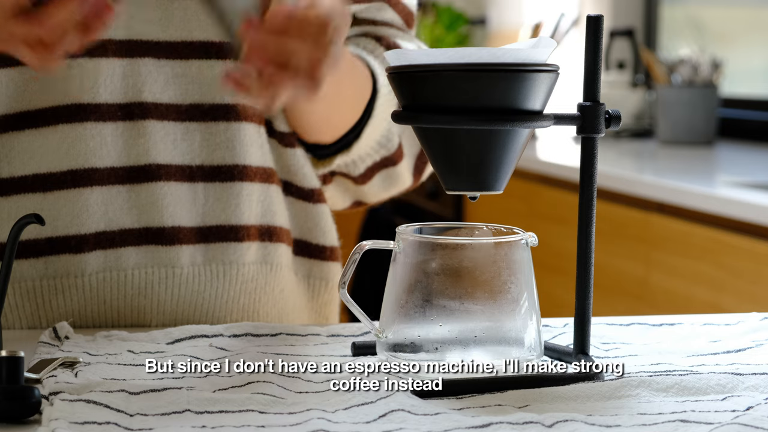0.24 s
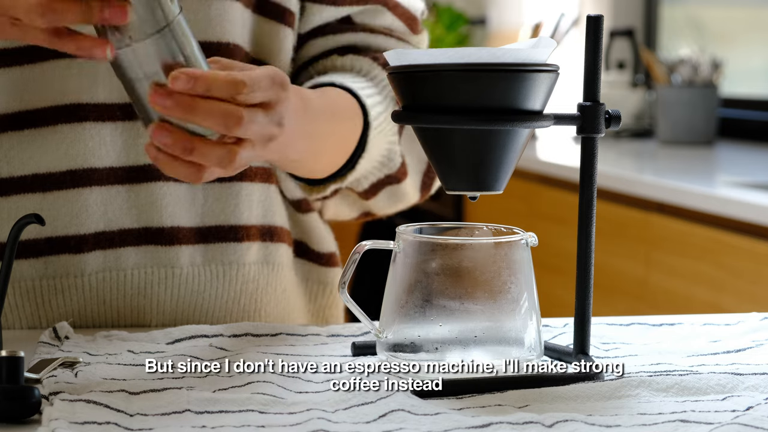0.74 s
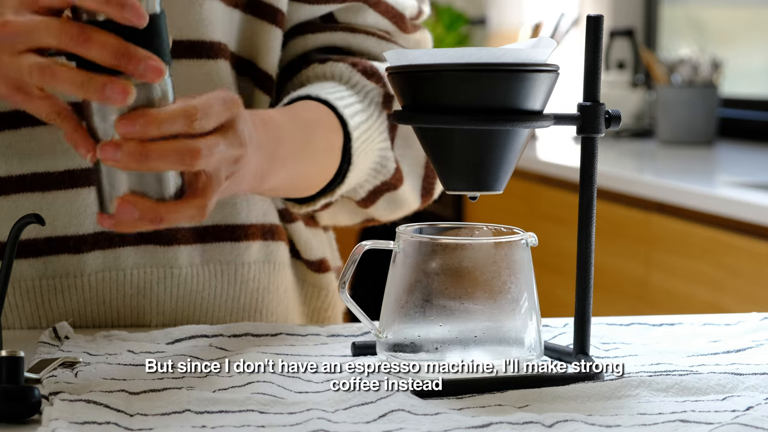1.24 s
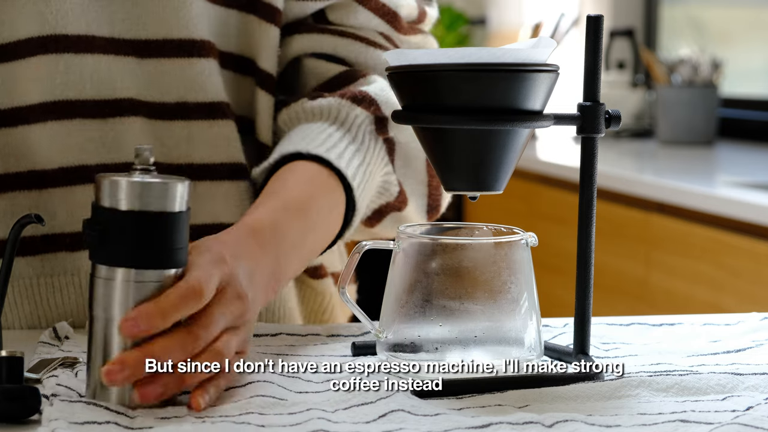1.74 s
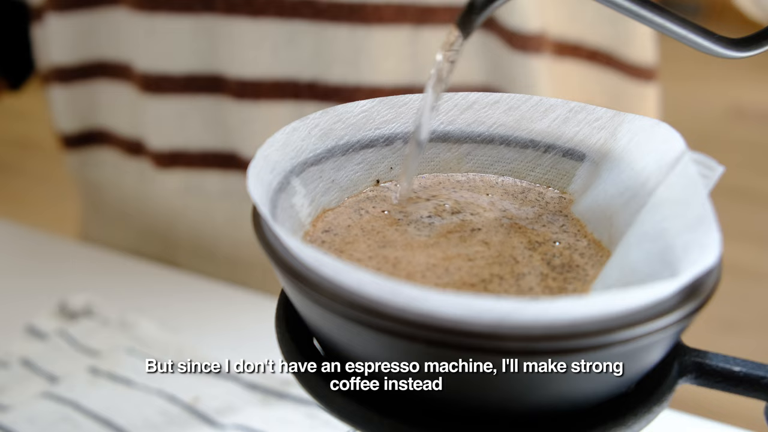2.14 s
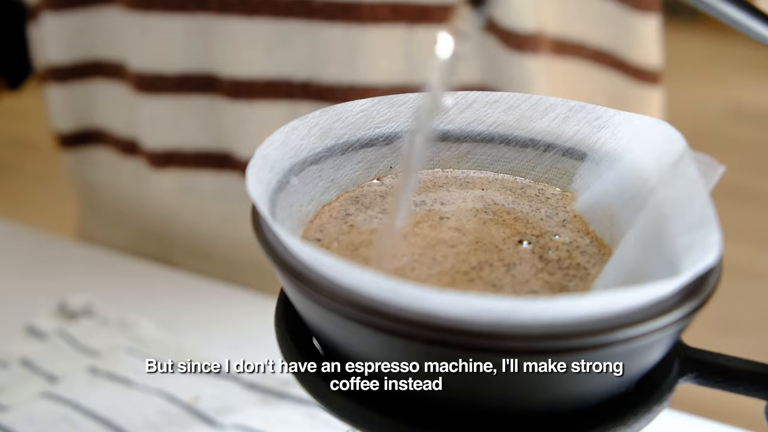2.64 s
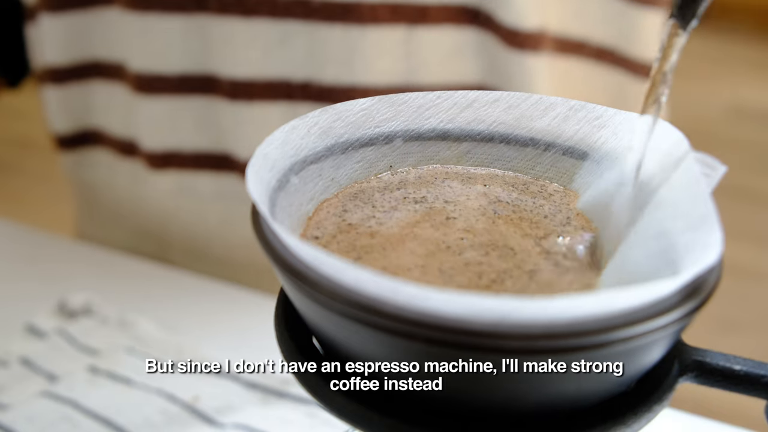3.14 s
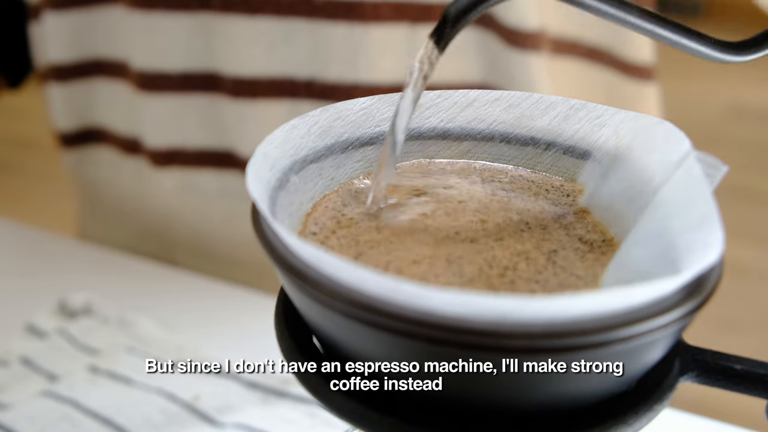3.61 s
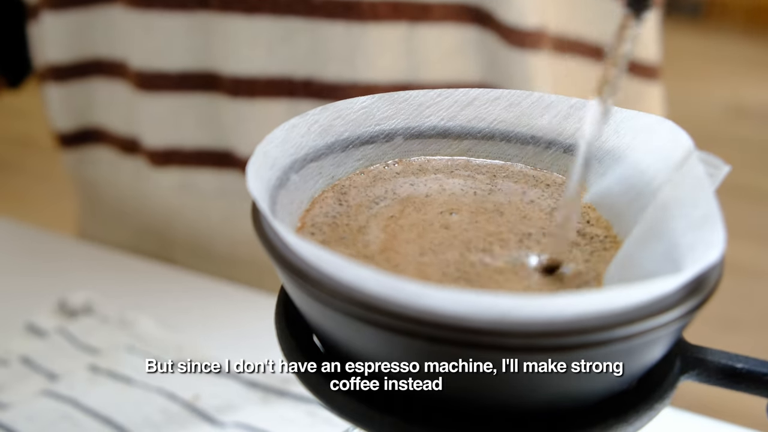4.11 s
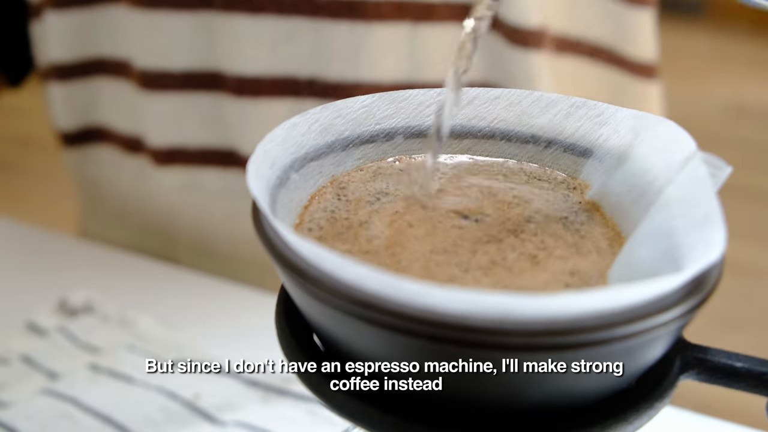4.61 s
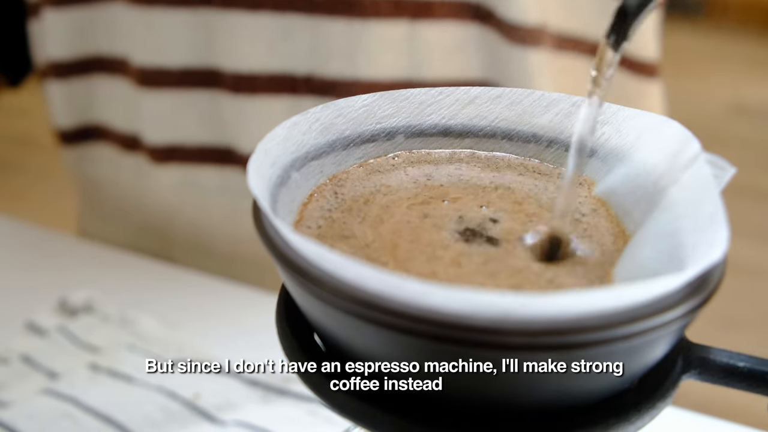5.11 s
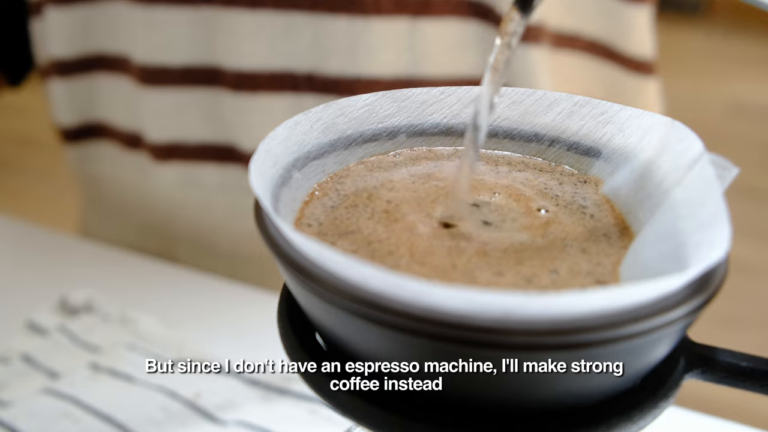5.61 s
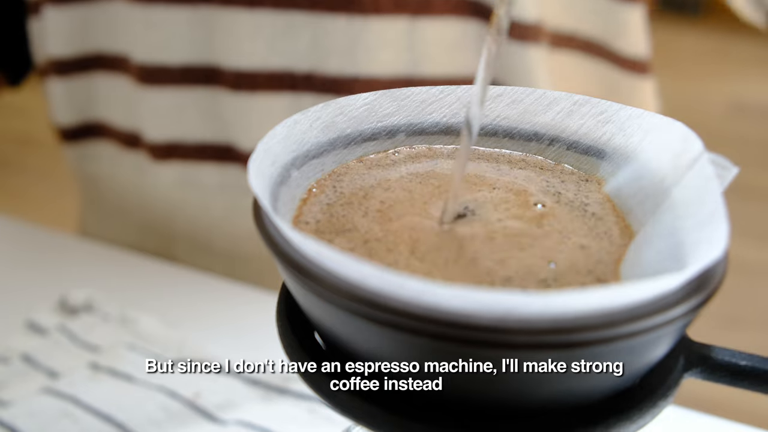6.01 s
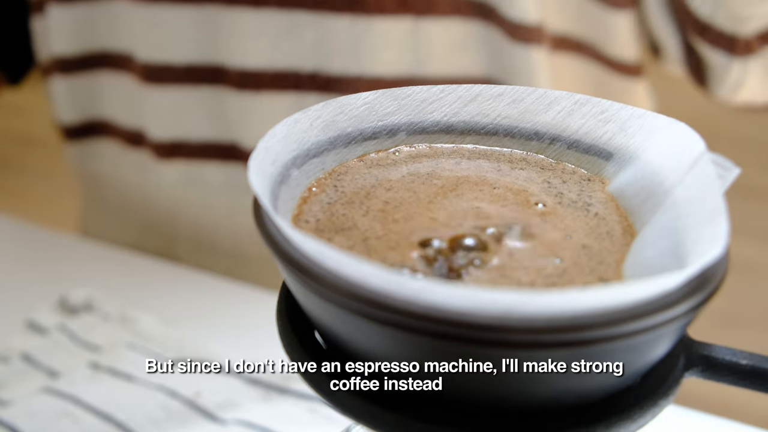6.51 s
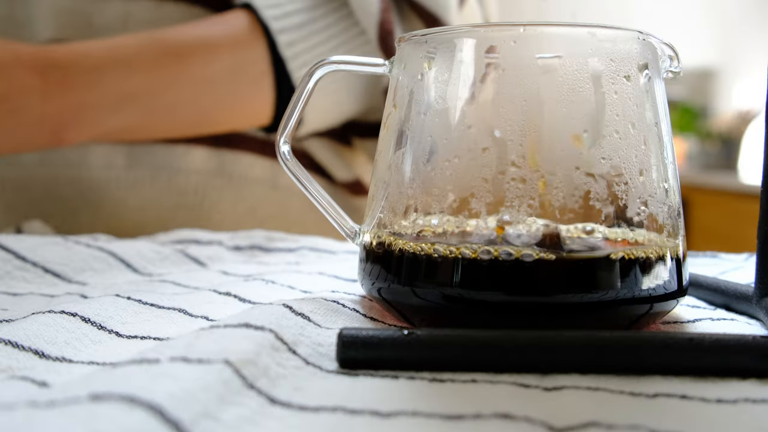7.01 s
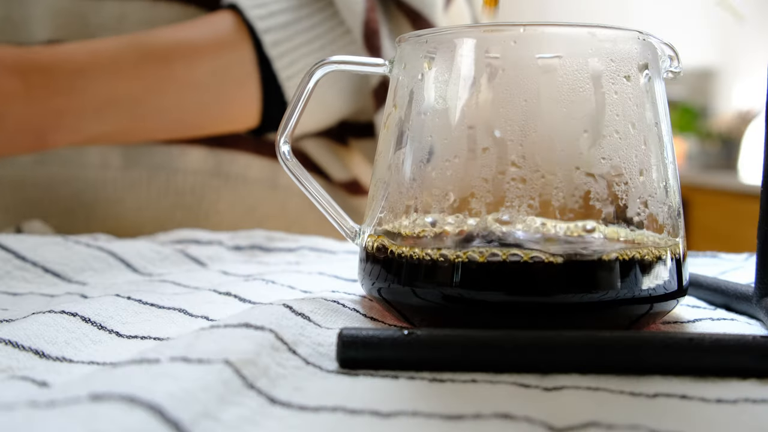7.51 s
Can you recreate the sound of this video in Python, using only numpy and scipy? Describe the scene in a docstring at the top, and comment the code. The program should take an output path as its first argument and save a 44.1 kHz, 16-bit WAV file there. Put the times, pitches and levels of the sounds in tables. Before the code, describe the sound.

Close in a small hard kitchen, a steel hand grinder gets a light tap, a brief scrape and a sharp hard knock as its halves shut, then a soft set-down. The sound moves nearer to coffee dripping into a glass server: irregular bright plinks growing denser, a burst of splatter and gurgle, then sparse drops and small glass taps over faint hum and hiss.

```python
"""A tap on a steel hand grinder, heard close by on a kitchen counter, then its halves pushed shut and set down.
Coffee then drips from a filter cone into a glass server: each drop is a climbing bubble tone, an air thump,
a slap and a noise splash, ringing the glass; finer trickle and a gurgle join it. Knocks are decaying modes.
A small hard room answers everything over a soft appliance hum and the hiss of a stereo microphone."""
import sys
import numpy as np
from scipy import signal
from scipy.fft import rfft, irfft
from scipy.io import wavfile
from scipy.ndimage import uniform_filter1d

SR = 44100
rng = np.random.default_rng(int(sys.argv[2]) if len(sys.argv) > 2 else 0)


def unload_audio(sound):
    """Save the sound as a 16-bit wav file, at the path given as the first command line argument."""
    columns = np.transpose(np.atleast_2d(sound))
    # keep every value between -1 and 1, then stretch to whole-number steps
    steps = np.round(np.clip(columns, -1, 1) * 32767)
    wavfile.write(sys.argv[1], SR, steps.astype(np.int16))


N = 341775  # samples

# Every ring time is the time to fall by 60 dB; drop levels are those ahead of the server and the room.
# Coffee drops. Each row: start in seconds, bubble starting pitch in Hz, bubble peak in dB, ring in seconds,
# air thump peak in dB, splash peak in dB.
DROPS = [(2.219, 2850, -47, 0.0091, -55.5, -45), (2.26, 2550, -42.5, 0.0051, -56, -59),
         (2.459, 2900, -46.5, 0.0067, -64, -39), (2.513, 2970, -29, 0.0057, -54, -27),
         (2.525, 1880, -34, 0.027, -26, -40), (2.602, 1340, -38.5, 0.035, -44, -49),
         (2.754, 3250, -32.5, 0.0065, -46.5, -46), (2.757, 2920, -34, 0.011, -63, -37),
         (2.825, 1250, -43, 0.031, -51, -68), (2.849, 2820, -43.5, 0.025, -55, -64),
         (2.856, 1880, -33, 0.014, -42.5, -62), (2.914, 2050, -46, 0.011, -60, -39),
         (3.026, 2060, -45, 0.019, -59, -58), (3.044, 2950, -34, 0.004, -50, -45),
         (3.267, 1320, -49, 0.02, -57, -53), (3.445, 3490, -30, 0.0062, -58, -44),
         (3.465, 3050, -29, 0.0034, -30, -36), (3.55, 2040, -32, 0.025, -41, -60),
         (3.61, 2840, -42, 0.008, -66, -41.5), (3.703, 2804, -29, 0.014, -42.5, -47),
         (4.102, 3300, -42, 0.012, -75, -56), (4.122, 2130, -25.5, 0.012, -52, -43.5),
         (4.23, 3150, -25.5, 0.0062, -52, -50), (4.284, 3090, -34.5, 0.008, -54, -28),
         (4.365, 3860, -45.5, 0.008, -59, -50), (4.405, 2920, -35.5, 0.017, -56, -49),
         (4.427, 4760, -25, 0.01, -45.5, -22), (4.474, 2840, -36.5, 0.0064, -55, -38),
         (4.719, 2910, -25.5, 0.012, -42, -47.5), (4.78, 1430, -44, 0.01, -52, -63),
         (4.819, 1020, -49, 0.017, -74, -48), (4.894, 3100, -28.5, 0.0061, -51, -41),
         (4.95, 1282, -28, 0.025, -51, -59), (5.013, 2600, -29.5, 0.015, -52, -32),
         (5.057, 2793, -19.5, 0.017, -40, -36), (5.161, 1200, -43.5, 0.0091, -61, -39.5),
         (5.2, 1470, -30, 0.027, -43, -51), (5.222, 2470, -48, 0.008, -55, -61),
         (5.238, 2900, -34, 0.0076, -31, -47), (5.253, 1620, -32.5, 0.021, -60, -51),
         (5.275, 2040, -29, 0.014, -44, -38.5), (5.281, 2520, -30.5, 0.0066, -41, -48),
         (5.441, 2055, -30, 0.022, -63, -41), (5.461, 1990, -22, 0.02, -27.5, -38),
         (5.514, 1630, -31.5, 0.015, -58, -47.5), (5.63, 1320, -43.5, 0.029, -58, -61),
         (5.679, 1236, -36, 0.029, -46, -62), (5.717, 1550, -35.5, 0.017, -56, -37),
         (5.81, 3200, -32, 0.0086, -45, -40.5), (5.898, 4860, -37, 0.012, -63, -40),
         (5.915, 3520, -33, 0.0067, -58, -42), (5.951, 2870, -22, 0.015, -64, -34),
         (5.964, 4950, -23.5, 0.0065, -39.5, -18.5), (6.025, 3240, -24.5, 0.011, -48, -36.5),
         (6.059, 2690, -34.5, 0.019, -43, -41.5), (6.117, 1480, -36, 0.019, -61, -61),
         (6.15, 1560, -37, 0.031, -71, -53), (6.169, 900, -36.5, 0.014, -62.5, -30),
         (6.195, 960, -29.5, 0.015, -41, -26.5), (6.228, 930, -25.5, 0.0071, -38, -39),
         (6.241, 940, -32, 0.01, -46, -52), (6.276, 920, -41, 0.012, -65, -49),
         (6.298, 1310, -44, 0.042, -68, -54), (6.299, 2680, -46, 0.008, -59, -46),
         (6.303, 1235, -37, 0.039, -61, -58), (6.304, 3040, -35.5, 0.008, -59, -62),
         (6.363, 2800, -29, 0.0054, -43.5, -56), (6.41, 3920, -32, 0.006, -68, -46),
         (6.446, 920, -41.5, 0.032, -62, -57), (6.487, 3950, -32, 0.0031, -69, -61),
         (6.547, 1410, -42.5, 0.026, -55, -49), (6.566, 1440, -47, 0.025, -56, -52),
         (6.604, 1690, -45, 0.028, -78, -39), (6.889, 1440, -44.5, 0.01, -70, -68),
         (6.986, 4150, -34.5, 0.0093, -46.5, -39.5), (7.034, 1280, -28.5, 0.014, -42.5, -49),
         (7.741, 2500, -34.5, 0.029, -53, -52)]
# Dry splash ticks. Each row: start in seconds, peak in dB, pitch in Hz.
TICKS = [(2.877, -45, 6200), (3.062, -43.5, 5000), (3.122, -49, 4960), (3.295, -50, 4060),
         (3.404, -47, 4000), (3.4532, -40, 11500), (4.017, -44, 7900), (4.061, -48, 7000),
         (5.255, -38, 8300), (5.782, -38.5, 8400), (6.217, -31, 9000), (6.2204, -33, 8600),
         (6.5061, -47, 11000), (6.513, -42.5, 12100), (6.559, -47, 7600), (6.6087, -42, 8200),
         (6.847, -43.5, 12900)]
# Sharp splats as the stream breaks up. Each row: start in seconds, peak in dB, pitch in Hz.
SPLATS = [(5.1612, -34.5, 2500), (6.17, -18, 4670), (6.177, -23, 2170), (6.1954, -12, 8500),
          (6.2285, -23, 1960), (6.242, -26, 1910), (6.2506, -39, 1940), (6.29, -28, 4390),
          (6.2966, -28, 2630), (6.323, -27, 1890), (6.336, -30, 2040), (6.342, -33, 2520),
          (6.352, -37, 2550), (6.3615, -40, 2270), (6.3662, -34, 2390), (6.3802, -22, 2200),
          (6.3986, -37, 4060), (6.486, -32, 3830)]
# Lone bubbles. Each row: start in seconds, peak in dB, starting pitch in Hz, ring in seconds,
# climb (the pitch has risen by twice this share at the end of the ring).
CHIRPS = [(2.184, -53, 1270, .03, .1), (4.615, -54, 1340, 0.028, .1), (4.647, -50, 1300, 0.034, 0.88),
          (4.83, -48, 1500, .025, .1), (4.955, -33, 1195, 0.021, 0.5), (6.568, -41, 1245, 0.023, 0.78)]
# Fine trickle between drops. Each row: time in seconds, level in dB.
TRICKLE = [(2.15, -69), (2.71, -63), (3.12, -68), (3.5, -65), (4.2, -69), (4.77, -66), (5.3, -64),
           (5.91, -68.5), (6.11, -63.5), (6.44, -75), (6.6, -64), (6.63, -98), (6.85, -67), (7.75, -80.5)]
# Glass modes set off by each splash. Each row: pitch in Hz, mean peak in dB re the splash, ring in seconds.
SPRAY = [(4947, -13, 0.01), (5940, -14, 0.023), (7320, -26.5, 0.05), (7930, -16.5, 0.019),
         (9880, -27, 0.03)]
# Air and wall resonances of the server. Each row: pitch in Hz, gain in dB re the shared gain, ring in seconds.
SERVER = [(848, -7.5, 0.027), (1250, -27, 0.12), (1637, -14, 0.3), (2008, -13.5, 0.069), (2450, -1.5, 0.37),
          (2690, -16, 0.073), (2960, -21, 0.066), (3060, -9, 0.2), (4050, -8, 0.055), (4700, -21, .2),
          (5050, -16, 0.063)]
# Tones that linger after some drops. Each row: start in seconds, peak in dB, pitch in Hz, ring in seconds.
LINGER = [(3.704, -54, 2343, 0.94), (4.125, -58.5, 2436, 1), (4.429, -50, 4640, 0.38),
          (4.431, -58, 4170, .4), (5.014, -62, 2500, 0.23), (5.288, -42.5, 850, 0.069),
          (6.428, -42, 2510, 0.043)]
# Nearby wall reflections of the drops. Each row: delay in seconds, gain in dB.
WALL_ECHOES = [(.0055, -21), (.008, -22)]
# Knocks on the counter. Each row: start in seconds, push length in ms, thud pitch factor, then levels in dB
# of thud, grinder, glass, crack and rattle; grinder or glass at -90 or below stays silent.
BLOWS = [(0.6106, 0.16, 1.65, -32, -27, -99, -27, -40), (0.756, 0.16, 4.7, -64, -48, -99, -33, -51),
         (0.946, .2, 1.2, -61, -66, -99, -60, -64.5), (1.039, 0.14, 2.2, -79, -62, -99, -48.5, -66),
         (1.088, .2, 0.6, -53.5, -83, -99, -54, -61.5), (1.19, 0.47, 1, -21, -40.5, -99, -17, -42),
         (1.7561, 1.66, 0.6, -43, -99, -99, -80, -70), (1.76, 0.52, 0.81, -44, -69, -99, -57, -70),
         (7.187, 0.38, 1.4, -35.5, -99, -44, -58, -46.5), (7.191, .2, 0.52, -66, -99, -31.5, -26, -59),
         (7.244, 0.24, 0.85, -77, -99, -50, -41, -67), (7.56, 1.13, 0.97, -48, -99, -99, -79, -65.5)]
# Dull body of counter and hand. Each row: pitch in Hz before the factor, relative level in dB, ring in seconds.
COUNTER = [(310, -14.5, 0.08), (429, -1.5, 0.035), (700, 10.5, 0.0077), (993, 3, 0.015), (1520, -1, 0.023)]
# Steel grinder body. Each row: centre pitch in Hz, relative level in dB, ring in seconds.
GRINDER = [(553, -24, 0.35), (945, -2, 0.085), (980, -17, 0.76), (1786, -11, 0.085), (2697, -18, 0.77),
           (2745, -20.5, 0.97), (4250, -22, 0.13), (5160, -23.5, 0.79), (5240, -9, 0.1), (6900, -30, 0.15),
           (7780, -21.5, .3), (8870, -16, 0.1), (11800, -28, 0.15), (14700, -36, .1)]
# Thick glass wall. Each row: centre pitch in Hz, relative level in dB, ring in seconds.
GLASS = [(344, -26, 0.048), (462, -10, 0.062), (513, -6.5, 0.032), (637, -4.5, 0.038), (1306, -12, .08),
         (2360, -18, 0.12), (2929, -11, 0.12), (3450, -16, 0.075), (4190, -7, 0.13), (4980, -11, 0.3),
         (5190, -5.5, 0.05), (6320, -19, 0.13), (7160, -9.5, 0.16), (7600, -3.5, 0.066), (8500, -7, 0.075),
         (9520, -8.5, 0.07), (10300, -17, 0.11), (11500, -15, .12)]
# Steel sliding on steel. Each row: start in seconds, stop in seconds, level in dB at start and at stop,
# before the grit.
SLIDES = [(0.753, 0.817, -51, -55.5), (1.033, 1.109, -71, -62), (1.16, 1.192, -64, -29.5)]
# Spectrum of the rubbing. Each row: frequency in Hz, relative level in dB.
SLIDE_COLOUR = [(1500, 0.5), (3500, 3), (7000, 3), (9000, 2.5), (12000, -6), (16000, -8)]
# Room echo in bands. Each row: centre in Hz, decay by 60 dB in seconds, energy of the tail in dB.
ECHO = [(209, 0.64, -27.5), (512, 0.91, -26.5), (1360, 1, -25.5), (3240, 0.9, -20), (6500, 0.72, -21.5),
        (10900, 0.35, -24.5)]
# Room tone at the first microphone place. Each row: frequency in Hz, relative density in dB.
ROOM_FAR = [(12, -49), (20, -24), (86, -20), (123, -13.5), (150, -12.5), (182, -10.5), (255, -6.5),
            (388, -6), (718, -14), (780, -17.5), (1060, -16.5), (1480, -22), (16000, -30)]
# Room tone at the closer microphone place. Each row: frequency in Hz, relative density in dB.
ROOM_NEAR = [(12, -49), (20, -11.5), (123, -8), (187, -7.5), (228, -2), (301, -1.5), (558, -6.5),
             (738, -11), (1000, -14), (1610, -25), (1760, -22.5), (14700, -22), (16000, -29)]
# Hiss of opposite sign left and right. Each row: frequency in Hz, relative density in dB.
SIDE_HISS = [(59, -28), (100, -9), (991, -3), (1610, -11), (3120, -9.5), (5900, -5.5), (12100, -5),
             (16000, -8)]
# Swells of the upper hum. Each row: centre in seconds, level in dB, time from centre to 1/e in seconds.
HUM_SWELLS = [(3.34, -63.5, 0.11), (5.564, -66.5, 0.11)]

GLIDE, RISE_MS = 0.042, 0.32  # climb and onset of a drop's bubble
THUMP_HZ, THUMP_S = 1661, 0.021
SLAP_DB, SPLASH_HZ = -34, 6020  # slap re the bubble; centre of the splash band
GURGLE_S, GURGLE_LENGTH_S, GURGLE_DB = 6.16, 0.28, -50  # level of the weakest gurgle bubble
TRICKLE_S, TRICKLE_LENGTH_S = 2, 5.7
SERVER_DB = 11.5  # shared gain of the server's resonances
SLIDE_EDGE_S = 0.0027
MOVE_S = 2.17  # background passes to the closer microphone place
FAR_DB, NEAR_DB, SIDE_DB = -63, -63, -71.5  # rms
LOW_HUM_HZ, LOW_HUM_DB, LOW_HUM_FAR_DB = 122, -76.5, 4  # near rms, and how much weaker at the first place
HUM_HZ, HUM_DB, HUM_WAVER_DB, HUM_WAVER_S = 184.5, -76, 2.5, 0.1  # random level steps, joined by lines
TOP_HZ = 16100


def undb(db):
    """Gain of a level in dB."""
    return 10 ** (np.asarray(db) / 20)


def fade(t, t60):
    """Exponential decay by 60 dB in t60 seconds."""
    return np.exp(-np.log(1000) * t / t60)


def curve(rows, count):
    """One dB column over time, at -150 outside its rows."""
    rows = np.array(rows)
    return np.interp(np.arange(N) / SR, rows[:, 0], rows[:, count], -150, -150)


def noise(shape, db, size=N):
    """Noise whose spectrum follows the shape, scaled to an rms level."""
    hz, gain_db = np.transpose(shape)
    f = np.arange(size // 2 + 1) * SR / size + 1
    gain = undb(np.interp(np.log(f), np.log(hz), gain_db))
    x = irfft(rfft(rng.standard_normal(size)) * gain, size)
    return x * undb(db) / x.std()


def add(out, s, sound):
    """Mix a sound in at s seconds."""
    i = int(s * SR)
    out[i:i + len(sound)] += sound[:N - i]


def ring(modes, detune=0):
    """Half a second of decaying sines: a body's modes answering a blow."""
    t = np.arange(SR // 2)[:, None] / SR
    hz, db, t60 = np.transpose(modes)
    return (undb(db) * fade(t, t60) * np.sin(2 * np.pi * hz * (1 + detune) * t)).sum(axis=1)


def bubble(hz, t60, glide, rise_ms):
    """A trapped bubble: a short tone of unit peak that climbs as it nears the surface."""
    t = np.arange(int(t60 * SR) + 20) / SR
    tone = np.sin(2 * np.pi * hz * t * (1 + glide * t / t60))
    x = tone * fade(t, t60) * (1 - np.exp(-t * 1000 / rise_ms))
    return x / np.abs(x).max()


def splash(hz, t60, width):
    """A tick of unit peak: a fading noise burst through the same resonant band twice."""
    b, a = signal.iirpeak(hz, 1 / width, fs=SR)
    burst = rng.standard_normal(400) * fade(np.arange(400) / SR, t60)
    x = signal.lfilter(b, a, signal.lfilter(b, a, burst))
    return x / np.abs(x).max()


def single_drops(out):
    """Each drop traps a bubble, thumps the air over the coffee, slaps the surface and sprays the glass."""
    scatter = rng.standard_normal((len(DROPS), len(SPRAY)))
    for (s, hz, db, t60, thump_db, splash_db), chances in zip(DROPS, scatter):
        add(out, s, undb(db) * bubble(hz, t60, GLIDE, RISE_MS))
        add(out, s, undb(thump_db) * bubble(THUMP_HZ, THUMP_S, glide=0, rise_ms=0.94))
        add(out, s, undb(db + SLAP_DB) * bubble(3000, 0.0007, glide=0, rise_ms=0.02))
        add(out, s, undb(splash_db) * splash(SPLASH_HZ, t60=0.0047, width=1.0))
        for (mode_hz, mode_db, mode_s), chance in zip(SPRAY, chances):
            level_db = splash_db + mode_db + 3.3 * chance
            add(out, s, undb(level_db) * bubble(mode_hz, mode_s, glide=0, rise_ms=0.92))


def ticks_and_chirps(out):
    """Dry ticks and splats are noise bursts; lone bubbles are tones, some climbing far."""
    for s, db, hz in TICKS:
        add(out, s, undb(db) * splash(hz, t60=0.018, width=0.33))
    for s, db, hz in SPLATS:
        add(out, s, undb(db) * splash(hz, t60=0.002, width=1.4))
    for s, db, hz, t60, climb in CHIRPS:
        add(out, s, undb(db) * bubble(hz, t60, climb, rise_ms=1.4))


def gurgle(out):
    """The broken stream gurgles: many brief bubbles crowded together."""
    for when, pitch, size in rng.random((70, 3)):
        sound = bubble(450 * 7 ** pitch, 0.0042, glide=0.28, rise_ms=0.37)
        add(out, GURGLE_S + when * GURGLE_LENGTH_S, undb(GURGLE_DB + 4.7 * size) * sound)


def trickle():
    """Fine trickle: a wash of tiny bubbles, scattered spray and faint stray drops under one level curve."""
    fine = np.zeros(N)
    for when, pitch, size in rng.random((8000, 3)):  # wash
        sound = bubble(1000 * 4.5 ** pitch, 0.005, glide=0.12, rise_ms=0.2)
        add(fine, TRICKLE_S + when * TRICKLE_LENGTH_S, undb(7 * size) * sound)
    for when, pitch, size in rng.random((160, 3)):  # spray
        sound = splash(2500 * 3.5 ** pitch, t60=0.007, width=0.25)
        add(fine, TRICKLE_S + when * TRICKLE_LENGTH_S, undb(8 + 10 * size) * sound)
    for when, pitch, size in rng.random((70, 3)):  # stray drops
        sound = bubble(1300 * 3 ** pitch, 0.021, GLIDE, rise_ms=0.32)
        add(fine, TRICKLE_S + when * TRICKLE_LENGTH_S, undb(9.5 + 4.6 * size) * sound)
    return fine / fine.std() * undb(curve(TRICKLE, count=1))


def server_ring(dry):
    """The server's air and walls resonate with what falls into them."""
    # dividing by the ring length makes each mode pass its own pitch with the listed gain
    modes = [(hz, db - 20 * np.log10(t60 * SR / 14), t60) for hz, db, t60 in SERVER]
    return undb(SERVER_DB) * signal.fftconvolve(dry, ring(modes))[:N]


def drops():
    """All the falling coffee, with wall reflections, the ringing server and lingering tones."""
    dry = np.zeros(N)
    single_drops(dry)
    ticks_and_chirps(dry)
    gurgle(dry)
    dry = dry + trickle()
    out = dry + server_ring(dry)
    for late_s, db in WALL_ECHOES:
        add(out, late_s, undb(db) * dry)
    for s, db, hz, t60 in LINGER:
        add(out, s, undb(db) * bubble(hz, t60, glide=0, rise_ms=2.6))
    return out


def blows():
    """Knocks: a push into the dull body, ringing steel and glass, a crack and a loose rattle."""
    out = np.zeros(N)
    rattle_colour = [(250, -14), (600, 6.5), (3000, -2.5), (6000, -15), (12000, -18)]
    for s, push_ms, pitch, thud_db, steel_db, glass_db, crack_db, rattle_db in BLOWS:
        push = np.hanning(int(push_ms * SR / 1000) + 3)  # a softer contact is longer and duller
        thud = np.convolve(ring(COUNTER, pitch - 1), push / push.sum())
        add(out, s, -undb(thud_db) * thud)
        for modes, db, split in ((GRINDER, steel_db, 0.008), (GLASS, glass_db, 0.013)):
            # uneven walls split each mode into a close, beating cluster
            for _ in range(5 if db > -90 else 0):
                detune = split * rng.standard_normal(len(modes))
                add(out, s, undb(db) * ring(modes, detune) / 2)
        add(out, s, undb(crack_db) * splash(2960, t60=0.01, width=0.87))
        rattle = noise(rattle_colour, rattle_db, SR // 4)
        add(out, s, rattle * fade(np.arange(SR // 4) / SR, 0.46))
    return out


def slide():
    """The two grinder halves rub: coloured noise with a rough, fast-changing level."""
    t = np.arange(N) / SR
    grit = undb(18 * uniform_filter1d(rng.standard_normal(N), size=40))
    strokes = np.zeros(N)
    for start, stop, start_db, stop_db in SLIDES:
        level = undb(np.interp(t, [start, stop], [start_db, stop_db]))
        outside_s = np.maximum(0, np.maximum(start - t, t - stop))
        strokes += level * np.exp(-outside_s / SLIDE_EDGE_S)
    return noise(SLIDE_COLOUR, 0) * grit * strokes


def room(dry):
    """Diffuse echo as decaying noise, band by band; the treble differs a little left and right."""
    t = np.arange(SR) / SR
    tail = np.zeros(SR)
    for hz, t60, db in ECHO:
        band = noise([(hz / 3, -40), (hz / 1.29, 0), (hz * 1.736, 0), (hz * 3, -40)], db, SR)
        tail += band * fade(t, t60) / np.sqrt(t60 * SR / 14)  # equal energy whatever the decay
    onset = np.clip(t / 0.0036, 0, 1)
    echo = signal.fftconvolve(dry, tail * onset)[:N]
    side = noise([(300, -18.5), (3000, -42), (8000, -8), (13000, 25.5)], -74, SR) * fade(t, 0.01)
    return echo + signal.fftconvolve(dry + echo, side)[:N] * np.array([[1], [-1]])


def background():
    """Shaped-noise room tone, a low hum line, a wavering upper hum line and microphone hiss."""
    t = np.arange(N) / SR
    tone = np.where(t < MOVE_S, noise(ROOM_FAR, FAR_DB), noise(ROOM_NEAR, NEAR_DB))
    low_level = undb(LOW_HUM_DB - LOW_HUM_FAR_DB * (t < MOVE_S))
    low_hum = np.sqrt(2) * low_level * np.sin(2 * np.pi * LOW_HUM_HZ * t)  # root 2 turns rms into peak
    steps = np.arange(0, t[-1] + HUM_WAVER_S, HUM_WAVER_S)
    wander = np.interp(t, steps, rng.standard_normal(len(steps)))
    waver = undb(HUM_DB + HUM_WAVER_DB * wander)
    swells = sum(undb(db) * np.exp(-((t - s) / half_s) ** 2) for s, db, half_s in HUM_SWELLS)
    hum = np.sqrt(2) * np.sin(2 * np.pi * HUM_HZ * t) * (waver + swells)
    hiss = noise(SIDE_HISS, SIDE_DB) * np.array([[1], [-1]])
    return tone + low_hum + hum + hiss


def scene():
    """All sources in the kitchen; small objects radiate no deep bass."""
    no_bass = signal.butter(4, 160, "high", fs=SR, output="sos")
    dry = signal.sosfilt(no_bass, drops() + blows() + slide())
    return dry + room(dry) + background()


def record(dry):
    """The recorder cuts the top with a steep low-pass."""
    return signal.sosfilt(signal.ellip(8, 0.2, 70, TOP_HZ, fs=SR, output="sos"), dry)


dry = scene()
out = record(dry)
unload_audio(out)
```